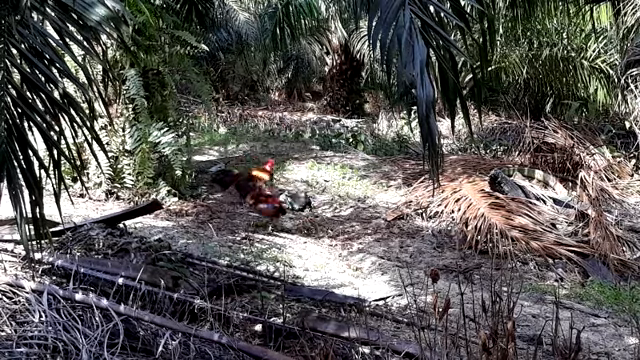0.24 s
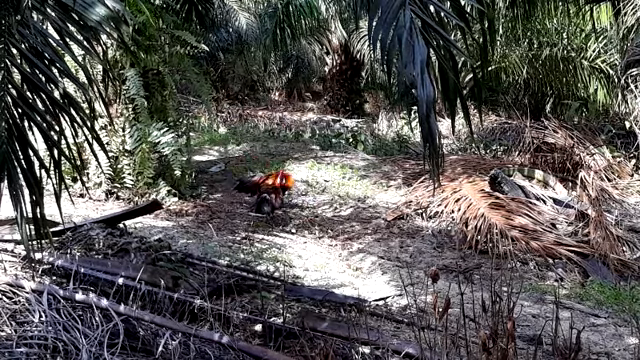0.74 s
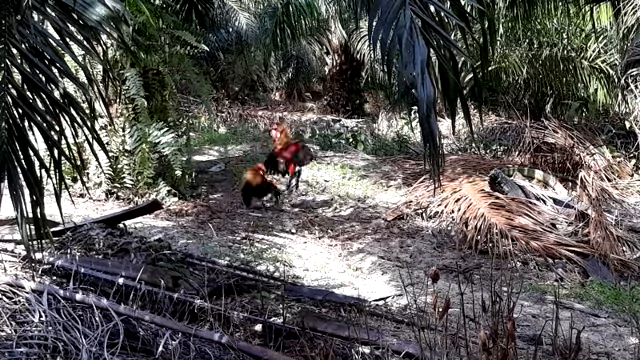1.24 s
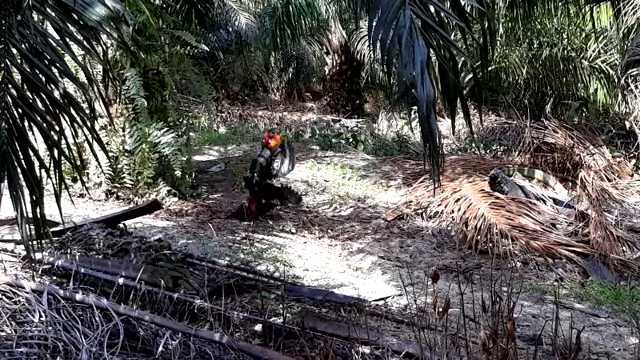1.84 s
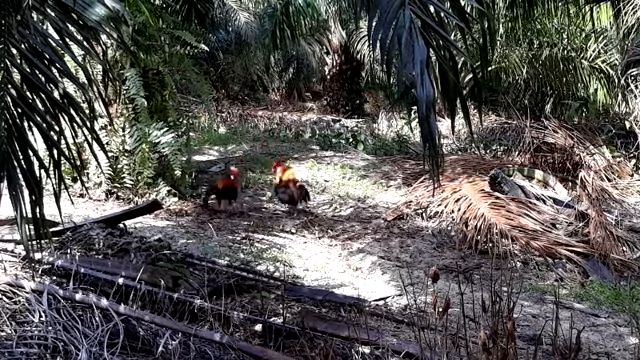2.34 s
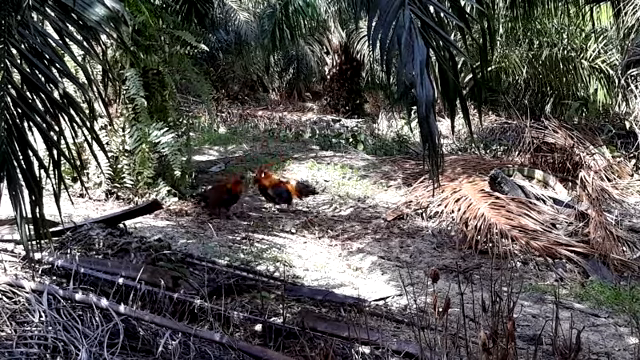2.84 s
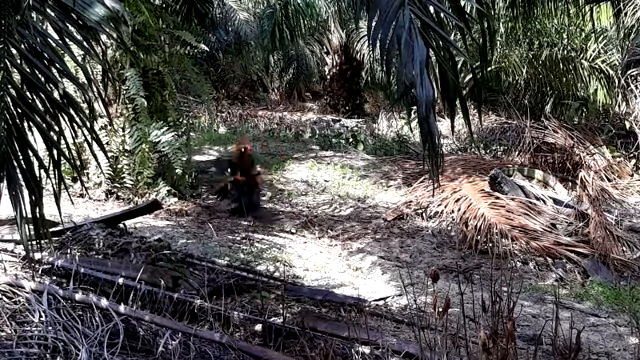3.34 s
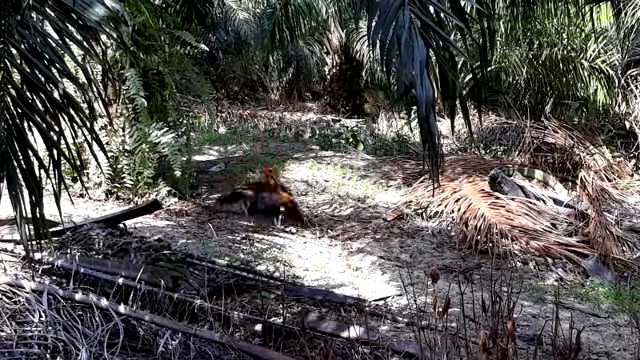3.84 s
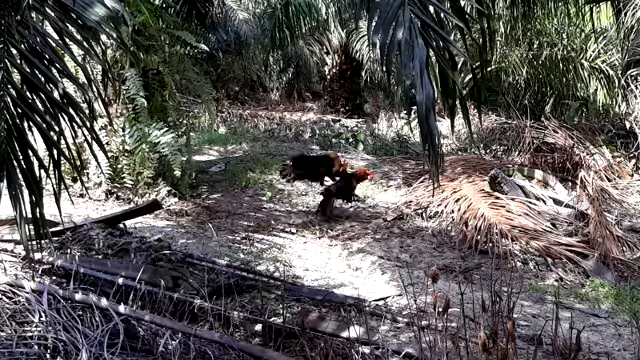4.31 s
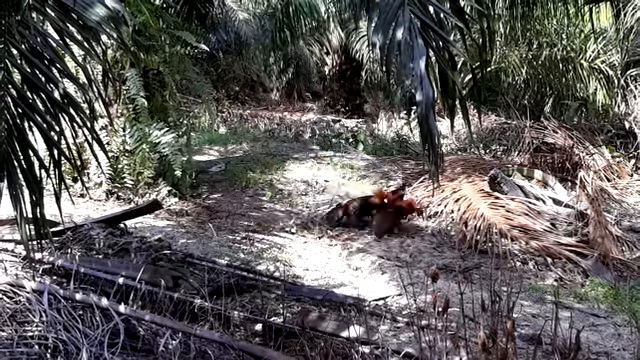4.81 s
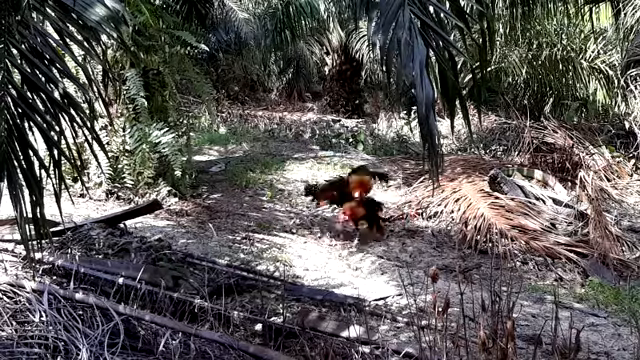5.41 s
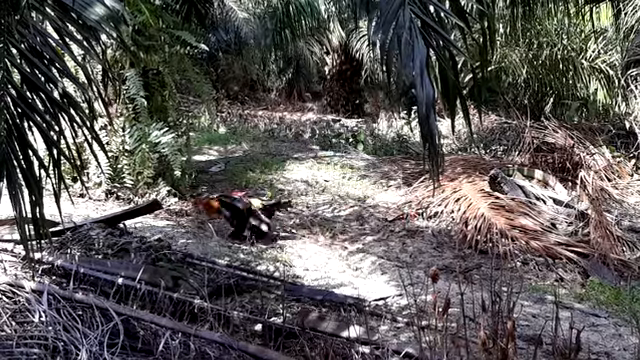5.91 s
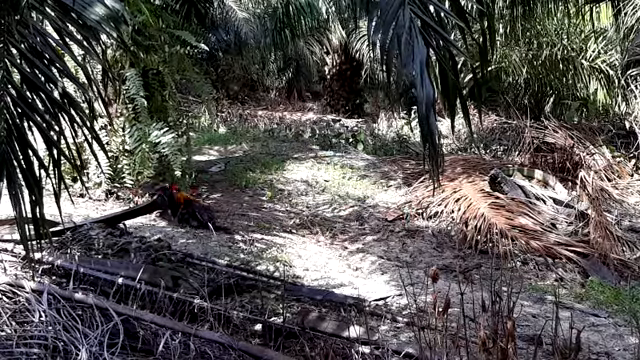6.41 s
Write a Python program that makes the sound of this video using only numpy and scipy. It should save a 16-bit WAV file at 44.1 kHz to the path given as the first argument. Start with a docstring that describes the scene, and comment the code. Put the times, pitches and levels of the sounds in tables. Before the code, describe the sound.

Two roosters clash in brief flurries of sharp wing slaps and dull thumps on dry leaves, under a steady high cicada drone.

```python
"""Cicadas drone (pulsing noise bands), a cricket chirps in paired strokes (gated tone) and another insect
buzzes (modulated noise) throughout, over a far machine's low hum (wavering sines) and the air of the grove.
Two roosters shuffle on dry leaves (shaped noise), with a faint blow at 1 s, then clash at 1.8, 3.2 and 4.3 s.
Wings slap (ringing bursts), bodies thump (low pulses), feathers swish and twigs snap (shaped noise);
trunks scatter the blows back (decaying noise echoes). After the longest clash, scuffling goes on to the end."""
import sys
import numpy as np
from scipy import signal
from scipy.fft import rfft, irfft, next_fast_len
from scipy.io import wavfile
from scipy.ndimage import map_coordinates

SR = 44100
rng = np.random.default_rng(int(sys.argv[2]) if len(sys.argv) > 2 else 0)


def master_out(mix):
    """Clip the mix to full scale and print it as 16-bit PCM to the path in sys.argv[1]."""
    frames = np.transpose(np.atleast_2d(mix))
    ceiling = np.clip(frames, -1, 1)
    pcm = np.round(ceiling * 32767).astype(np.int16)
    wavfile.write(sys.argv[1], SR, pcm)


N = 293706


def amp(db):
    """Decibel law: amplitude ratio of a level."""
    return 10 ** (np.asarray(db) / 20)


def unit(x):
    """Normalisation to an rms of 1."""
    return x / np.sqrt(np.mean(x ** 2) + 1e-20)


def along(points, hz):
    """Interpolation of (Hz, value) points on a logarithmic frequency axis."""
    f, v = np.transpose(points)
    return np.interp(np.log(hz + 1), np.log(f + 1), v)


def wobble(rate):
    """Slow random modulation: a smooth curve through normal random knots, rate of them a second."""
    knots = rng.standard_normal(int(N * rate / SR) + 4)
    return map_coordinates(knots, [np.arange(N) * rate / SR])


def filtered(x, response):
    """Linear filtering: the spectrum of x times a response of frequency."""
    m = next_fast_len(N + SR // 2)
    return irfft(rfft(x, m) * response(np.fft.rfftfreq(m, 1 / SR)), m)[..., :N]


def coloured(x, spectrum):
    """Spectral shaping: x weighted by (Hz, dB) points, silent outside their ends, rms 1."""
    lowest_hz, highest_hz = spectrum[0][0], spectrum[-1][0]

    def response(hz):
        return amp(along(spectrum, hz)) * (hz > lowest_hz) * (hz < highest_hz)

    return unit(filtered(x, response))


def bells(middles, width):
    """Amplitude gating: a smooth swell of height 1 around each time."""
    t, m = np.arange(N) / SR, np.sort(middles)
    after = np.clip(np.searchsorted(m, t), 0, len(m) - 1)
    before = np.maximum(after - 1, 0)
    nearest = np.minimum(np.abs(t - m[after]), np.abs(t - m[before]))
    return np.exp(-(nearest / width) ** 4)


def band(lo_hz, hi_hz, x):
    """Causal band-pass filtering."""
    return signal.sosfilt(signal.butter(2, [lo_hz, hi_hz], "band", fs=SR, output="sos"), x)


def surges(rows, *beds_db):
    """Incoherent addition: each row swells to its peak and fades, its power added to a bed, as gains."""
    t, power = np.arange(N) / SR, amp(2 * np.array(beds_db))
    for s, rise, fall, *db in rows:
        at = slice(max(round((s - .4) * SR), 0), round((s + .6) * SR))
        # straight slopes in dB, 20 dB down after one rise or fall time
        slope_db = -20 * np.maximum((s - t[at]) / abs(rise), (t[at] - s) / abs(fall))
        power[:, at] += amp(2 * (np.array(db)[:, None] + slope_db))
    return np.sqrt(power)


def slaps():
    """Impact and damped resonance: a cupped wing rings briefly as contact bursts into a crack and thin edge."""
    # slaps of wing, spur and beak: start_s, level_db (before filtering), body_db (relative to level_db),
    # body_hz, t60_s
    contacts = [(1.0398, -39.5, -9.5, 1210, 0.03), (1.814, -17.5, -13, 1050, 0.0092),
                (1.822, -35, -11, 942, 0.016), (1.8543, -21.5, -8.5, 1220, 0.022),
                (1.8583, -19, -7.5, 1090, .016), (1.908, -17.5, -14, 1150, 0.012),
                (1.912, -27.5, -3, 810, 0.015), (1.916, -28, -8, 930, 0.0091),
                (3.251, -20.5, 7.5, 1287, 0.012), (3.2552, -13.5, -8.5, 1360, 0.016),
                (3.2596, -21.5, -12, 1430, 0.024), (3.2764, -22, -24, 1320, 0.065),
                (3.62, -43, -4, 900, 0.016), (4.1322, -54.5, 2.5, 1230, .018),
                (4.283, -31, -24, 1180, .017), (4.2906, -34.5, 6.5, 1320, 0.017),
                (4.3071, -28.5, -19, 1160, 0.036), (4.347, -28, -19, 1361, 0.018),
                (4.375, -37, -12, 1370, .02), (4.3842, -29, -12, 920, 0.049),
                (4.4113, -23.5, -22, 1360, 0.032), (4.4304, -12.5, -8.5, 1320, 0.012),
                (4.4374, -19, -20, 1310, 0.018), (4.443, -24, -19, 1500, .023),
                (4.475, -22, -12.5, 1215, 0.023), (4.528, -27, -5, 1070, .019),
                (4.5468, -32, -11, 999, .012), (4.6074, -32.5, -4, 950, 0.019),
                (4.6278, -35, -14, 1290, .04), (4.7157, -36.5, -15, 1210, 0.021),
                (4.7426, -38, -16, 1010, .016), (5.4047, -43, -13, 1350, .011)]
    rise_s, edge_db = .0004, -17  # the edge level is relative to level_db
    body, crack, edge = np.zeros((3, N + SR))
    t = np.arange(SR // 10) / SR
    rise = 1 - np.exp(-t / rise_s)
    for s, db, body_db, hz, t60 in contacts:
        shape = amp(db - 60 * t / abs(t60)) * rise
        burst = shape * rng.standard_normal((3, len(t)))
        ring = shape * np.sin(2 * np.pi * hz * t)
        at = slice(round(s * SR), round(s * SR) + len(t))
        body[at] += amp(body_db) * (1.24 * ring + 1.72 * burst[0])
        crack[at] += 1.05 * burst[1]
        edge[at] += amp(edge_db) * burst[2]
    body = band(740, 2320, band(740, 2320, body[:N]))
    return body + band(2130, 5960, crack[:N]) + band(8000, 15500, edge[:N])


def thumps():
    """Volume displacement: each blow squeezes out a low push of air, a cosine under a Gaussian envelope."""
    # thumps of breast and cupped wing: centre_s, level_db (before filtering), pitch_hz,
    # cycles (count between the 1/e points of the envelope)
    pushes = [(1.044, -43.5, 153, 1.15), (1.816, -30, 200, 0.5), (1.846, -32.5, 153, 0.85),
              (1.867, -30, 153, 1.4), (1.912, -27.5, 245, 1.08), (3.206, -36.5, 247, 2.3),
              (3.22, -39, 159, 2.2), (3.238, -37, 158, 2.1), (3.26, -20, 182, 0.67),
              (3.621, -44.5, 333, 1.8), (4.135, -42.5, 170, 0.53), (4.301, -25.5, 216, 0.83),
              (4.327, -24, 234, 0.91), (4.347, -33, 250, 0.59), (4.387, -24.5, 298, 2.15),
              (4.433, -16, 219, 0.76), (4.439, -27, 201, 0.54), (4.531, -26.5, 199, 0.45),
              (4.564, -32, 363, 3), (4.611, -33, 370, 1.3), (4.744, -44, 161, 0.63),
              (5.41, -38.5, 184, 1.1)]
    out, t = np.zeros(N), np.arange(-SR // 20, SR // 20) / SR
    for s, db, hz, cycles in pushes:
        envelope = np.exp(-(2 * hz * t / cycles) ** 2)
        out[round(s * SR) - SR // 20:][:len(t)] -= amp(db) * np.cos(2 * np.pi * hz * t) * envelope
    return band(119, 890, out)


def grove(x):
    """Diffuse scattering: trunks and fronds return each frequency as noise that decays at its own speed."""
    # decay of the scattered sound: frequency_hz, t60_s
    decay = [(150, 0.16), (1000, 0.12), (4000, 0.44), (12000, 0.21)]
    # a tail drawn anew for each 1/25 s of sound keeps the scattering even
    out, step = np.zeros(N + SR), SR // 25
    for start in range(0, N, step):
        piece = x[start:start + step]
        if np.abs(piece).max() > 1e-4:  # near-silent pieces return nothing
            hz, t, z = signal.stft(rng.standard_normal(SR // 2), SR, nperseg=256)
            fade = amp(-60 * t / along(decay, hz)[:, None])
            tail = signal.istft(z * fade, SR, nperseg=256)[1]
            echo = signal.fftconvolve(piece, tail / np.linalg.norm(tail))
            out[start + 250:][:len(echo)] += echo  # 250 samples of delay
    return out[:N]


def scuffle():
    """Friction and turbulence: leaves crackle in uneven grains, feathers swish and wings push air."""
    # spectra of leaf crackle, dry shreds, feather swish and pushed air: frequency_hz, level_db
    leaf_spectrum, shred_spectrum = [(1400, -37), (2300, -17), (3100, -10), (4400, -1), (6000, -3.5),
                                     (8000, 0), (9500, -7.5), (10500, -31.5)], [(8500, -12), (9700, -5), (12000, -0.5), (15000, 1.5),
                                                     (15900, -13)]
    feather_spectrum, air_spectrum = [(450, -16), (620, -7.5), (950, -6), (1150, -2.5), (1400, -5.5),
                                      (1600, -10.5), (2000, -9.5), (2400, -12.5), (4000, -10)], [(60, -54), (110, 6), (160, 1.5), (330, -2.5),
                                                        (450, -8.5), (600, -28.5)]
    # feet and bodies ploughing the litter: peak_s, rise_s, fall_s (both over 20 dB),
    # leaf_db, shred_db
    scrambles = [(1.04, 0.04, 0.28, -54, -60), (1.36, .1, 0.45, -63, -66), (1.71, .12, .2, -65, -76),
                 (1.82, 0.0089, 0.071, -36, -44), (1.862, 0.014, 0.086, -41.5, -49),
                 (1.915, 0.017, 0.061, -40.5, -46.5), (1.99, 0.11, .2, -61, -63),
                 (3.204, 0.013, .3, -50, -69.5), (3.256, 0.012, 0.11, -40, -47),
                 (3.36, 0.091, 0.23, -56, -63), (3.55, 0.12, 0.13, -59, -65),
                 (3.645, 0.087, 0.32, -56.5, -68), (3.765, 0.18, 0.088, -53.5, -57.5),
                 (4.24, 0.12, 0.22, -60.5, -61), (4.284, 0.0086, 0.3, -46, -52),
                 (4.347, .01, 0.22, -51, -58), (4.412, .015, 0.18, -43.5, -53),
                 (4.478, .015, 0.18, -44.5, -52), (4.53, .015, 0.14, -50, -55),
                 (4.585, 0.028, .3, -47, -51.5), (4.72, .08, 0.11, -49, -61), (4.885, .006, .08, -50, -62),
                 (5.15, 0.1, .15, -57.5, -65), (5.25, .1, 0.17, -65, -70), (5.37, 0.1, 0.12, -56, -63),
                 (5.54, .07, 0.13, -56, -60), (5.77, 0.043, 0.16, -49.5, -55), (5.85, .06, 0.14, -49, -58),
                 (6.095, .03, 0.33, -55, -61), (6.15, .05, 0.16, -55, -60), (6.38, .12, 0.11, -60, -63)]
    # wing beats: peak_s, rise_s, fall_s (both over 20 dB), swish_db, air_db
    beats = [(1.06, .06, 0.13, -59.5, -61.5), (1.82, 0.0067, 0.14, -46.5, -41.5),
             (1.85, 0.026, .06, -41, -40.5), (1.925, .1, 0.14, -54.5, -54.5), (2.0, 0.11, 0.22, -74, -58.5),
             (3.202, 0.0076, 0.22, -51, -47), (3.252, 0.037, 0.054, -45, -39.5),
             (3.36, 0.12, 0.1, -56, -53.5), (3.5, 0.097, 0.11, -61, -55), (3.63, 0.038, 0.24, -60.5, -59),
             (4.14, 0.024, 0.059, -69, -60), (4.24, .06, .2, -68, -57), (4.288, 0.0077, 0.23, -45.5, -43.5),
             (4.32, 0.055, 0.044, -43.5, -47), (4.37, 0.037, 0.18, -43.5, -42),
             (4.445, .04, 0.055, -45, -56), (4.48, .02, 0.068, -50, -45), (4.55, 0.086, .15, -46.5, -44.5),
             (4.595, .08, 0.12, -48, -54.5), (4.72, 0.031, 0.092, -54, -44.5), (4.8, 0.068, 0.21, -65, -57),
             (4.895, 0.044, 0.082, -61.5, -56), (5.23, .1, 0.16, -63, -61), (5.4, 0.12, 0.12, -61.5, -55.5),
             (5.855, 0.12, 0.18, -59.5, -58), (6.1, 0.044, 0.18, -58, -52.5), (6.155, 0.06, 0.12, -55, -54),
             (6.55, 0.17, 0.21, -71, -58)]
    # restless shuffling between the clashes: time_s, leaf_db
    shuffle = [(0, -73), (.15, -75), (.4, -76), (.6, -73), (.95, -72), (1.2, -66), (1.6, -73.5),
               (2.05, -60.5), (2.3, -66.5), (2.6, -73.5), (3.15, -69), (3.45, -63), (4.1, -66),
               (4.8, -58.5), (5.05, -60), (5.5, -62), (5.95, -59.5), (6.3, -63.5), (6.66, -63)]
    shuffle_db = np.interp(np.arange(N) / SR, *np.transpose(shuffle))

    def follow(db, share):
        """Proportional levels: db at -70 dB of crackle, plus share dB for each dB above that."""
        return db + share * (shuffle_db + 70)

    def grainy(depth_db, rate):
        """Amplitude modulation: noise of randomly wavering level."""
        return amp(depth_db * wobble(rate)) * rng.standard_normal(N)

    leaf_gain, shred_gain = surges(scrambles, shuffle_db, follow(-75.5, 0.9))
    swish_gain, air_gain = surges(beats, follow(-77, .4), follow(-68, 0.18))
    # the litter breaks in clumps, coarse and fine together
    crunch = amp(.8 * wobble(45) + 1.8 * wobble(250))
    leaves = coloured(crunch * grainy(depth_db=-1.0, rate=300), leaf_spectrum)
    shreds = coloured(crunch * grainy(depth_db=1.0, rate=600), shred_spectrum)
    swish = coloured(grainy(depth_db=2.5, rate=77), feather_spectrum)
    air = coloured(grainy(depth_db=1.5, rate=47), air_spectrum)
    return leaf_gain * leaves + shred_gain * shreds + swish_gain * swish + air_gain * air


def twigs():
    """Brittle fracture: a dry twig's snap is a very short, decaying burst of bright noise."""
    # snaps: start_s, level_db (before filtering), lowest_hz
    snaps = [(.555, -52, 9000), (.974, -52, 9000), (1.318, -45, 4500), (1.397, -33.5, 7500),
             (2.016, -46, 3000), (4.882, -30, 3500), (5.891, -40, 8000)]
    out, t = np.zeros(N), np.arange(SR // 100) / SR
    for s, db, low_hz in snaps:
        snap = amp(db - 60 * t / .009) * rng.standard_normal(len(t))  # t60 of 9 ms
        out[round(s * SR):][:len(t)] += band(low_hz, 15500, snap)
    return out


def cicadas():
    """Incoherent chorus: countless tymbal clicks blur into two noise bands; the nearest singer throbs."""
    # spectra of the tymbal's tone and of its overtone: frequency_hz, level_db
    tone_spectrum, overtone_spectrum = [(5800, -32), (6500, -17), (6950, -2), (7300, 0), (7600, -8),
                                        (8100, -18), (8800, -24), (9900, -36)], [(12800, -18), (13400, -11), (13800, -3), (14250, 0),
                                                        (14500, -4), (14800, -3), (15200, -6), (15800, -6)]
    near_spectrum = [(14450, -18), (14700, -1), (14850, 0), (15100, -18)]
    throb_hz = 17.0 + 0.31 * wobble(1.5)
    throb = np.sin(2 * np.pi * np.cumsum(throb_hz) / SR)

    def clicks():
        """Random superposition: noise of quickly wavering level."""
        return amp(1.6 * wobble(400)) * rng.standard_normal(N)

    tone = amp(-54.5 + 1.3 * throb + .5 * wobble(7)) * coloured(clicks(), tone_spectrum)
    overtone = amp(-66 + .6 * wobble(4.3)) * coloured(clicks(), overtone_spectrum)
    near = amp(-73 + 5 * throb) * coloured(clicks(), near_spectrum)
    return tone + overtone + near


def cricket():
    """Stridulation: two strokes of the wing file per chirp on a nearly pure pitch, with a weak trunk echo."""
    # phrases: first_chirp_s, pairs (count of stroke pairs)
    phrases = [(-.030, 4), (.796, 6), (2.092, 3), (2.721, 21)]
    pair_every_s, echo_delay_s, echo_db = .1957, .017, -10
    first = np.concatenate([s + pair_every_s * np.arange(pairs) for s, pairs in phrases])
    strokes = bells(np.concatenate([first - .001, first + .041]), width=.009)
    pitch_hz = 8478 + 30 * wobble(60)
    level_db = -60.5 + 2 * wobble(12) + 1.5 * wobble(150)
    song = amp(level_db) * strokes * np.sin(2 * np.pi * np.cumsum(pitch_hz) / SR)
    return song + amp(echo_db) * np.roll(song, round(echo_delay_s * SR))


def buzzer():
    """Amplitude modulation: an insect's fast rasps pulse a narrow noise band for a tenth of a second."""
    # buzzes: middle_s, level_db
    buzzes = [(.24, -69), (.77, -68), (1.29, -69), (1.8, -74), (2.35, -67.5), (2.87, -69), (3.6, -70),
              (4.12, -68), (4.76, -70), (5.268, -67), (5.83, -66), (6.37, -68)]
    t = np.arange(N) / SR
    rasps = (1 + 0.32 * np.sin(2 * np.pi * 140 * t)) * rng.standard_normal(N)
    tone = coloured(rasps, [(8600, -21), (8900, 3), (9200, -4), (9450, -21), (9700, -28)])
    return tone * sum(amp(db) * bells([s], width=0.061) for s, db in buzzes)


def background():
    """Beats and broadband noise: wavering low machine tones lie over far rumble and the air of the grove."""
    # tones of the far machine: pitch_hz, level_db, waver_hz
    hum_tones = [(51.5, -69.5, 0.25), (62, -68, 0.28), (116.6, -66, 6.07)]
    # steady air of the grove and far rumble: frequency_hz, level_db
    air_spectrum = [(12, -30), (40, -12), (70, -3.5), (110, 4), (170, -2.5), (300, -14.5), (450, -18),
                    (1200, -21.5), (2500, -25), (4300, -23), (6000, -20), (10400, -34), (13000, -27),
                    (16000, -20.5)]
    hum = np.zeros(N)
    for hz, db, waver in hum_tones:
        level = amp(db + 1.2 * wobble(2.7))
        hum += level * np.sin(2 * np.pi * np.cumsum(hz + waver * wobble(17)) / SR)
    air_level = amp(-63 + 0.27 * wobble(4.3))
    return hum + air_level * coloured(rng.standard_normal(N), air_spectrum)


def scene():
    """Superposition: every source adds at one point, and only the blows excite the grove's echo."""
    blows = slaps() + thumps()
    birds = blows + amp(-8.5) * grove(blows) + scuffle() + twigs()
    mono = birds + cicadas() + cricket() + buzzer() + background()
    return np.array([mono, mono])


def record(dry):
    """Band limiting: a faint opposed hiss parts the channels; the deepest bass and the top are cut."""
    # hiss between the channels: frequency_hz, level_db
    hiss_spectrum = [(25, 7), (100, -7), (600, -2.5), (1500, -28), (4000, -12), (7000, -22), (12000, -6),
                     (15000, -4)]
    top_hz, bass_hz = 15760, 30
    faint = amp(-86) * coloured(rng.standard_normal(N), hiss_spectrum)
    both = dry + np.array([faint, -faint])
    return filtered(both, lambda hz: (hz < top_hz) * hz ** 2 / (hz ** 2 + bass_hz ** 2))


dry = scene()
out = record(dry)
master_out(out)
```